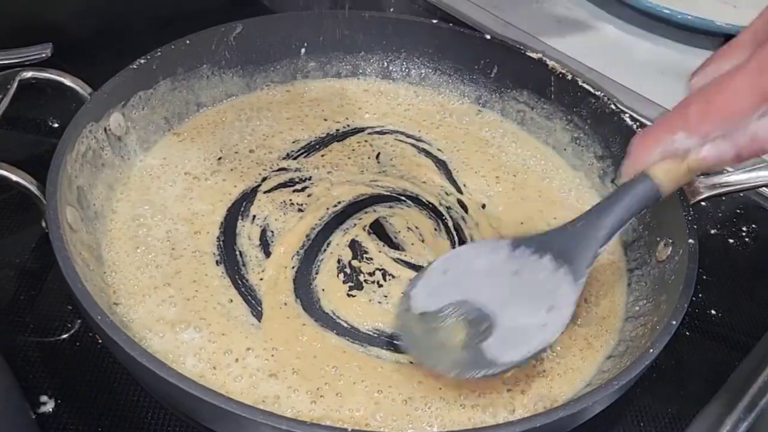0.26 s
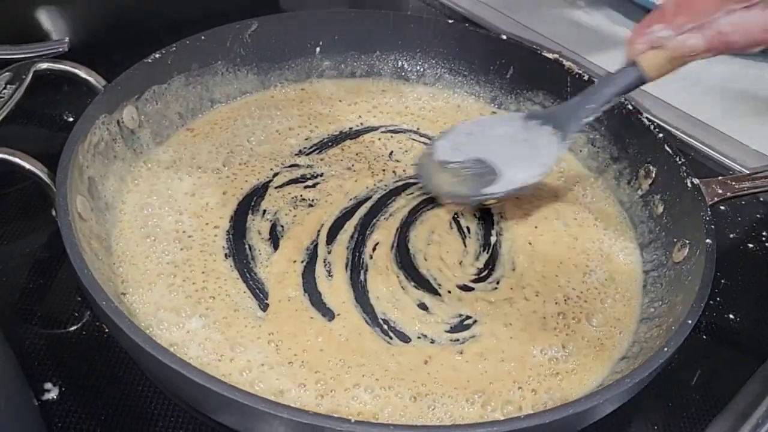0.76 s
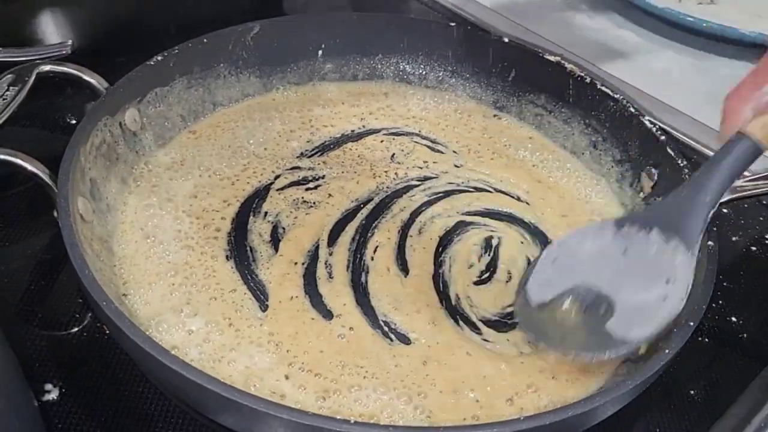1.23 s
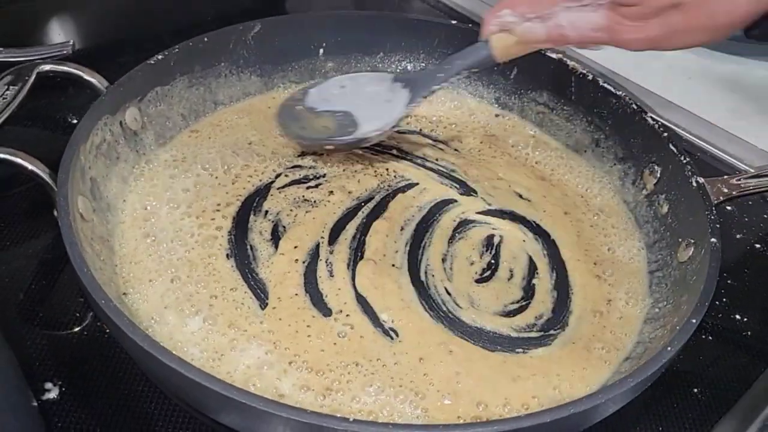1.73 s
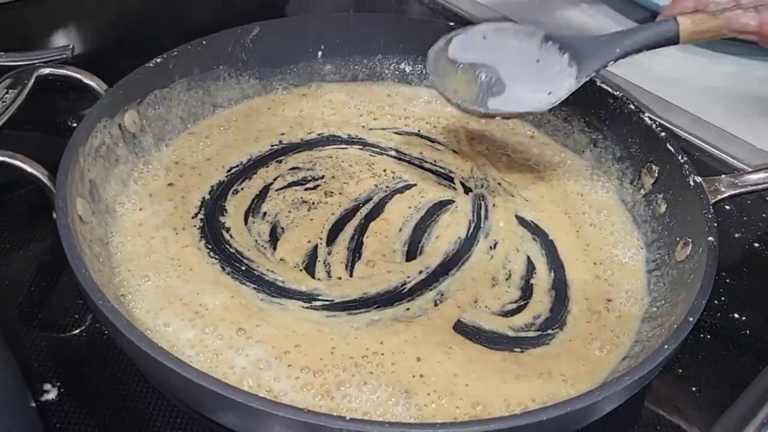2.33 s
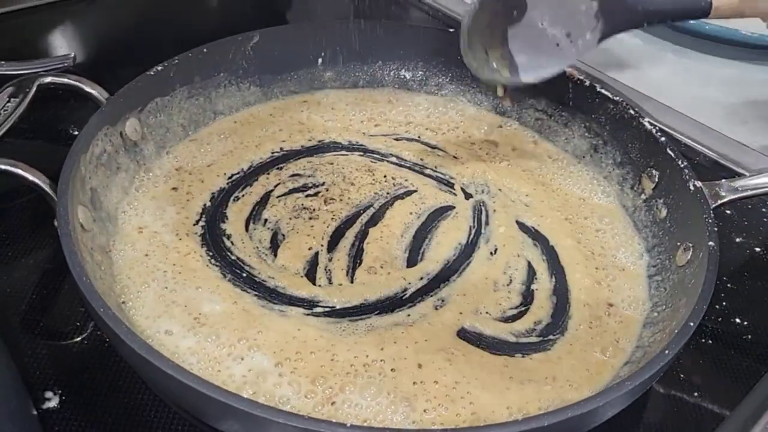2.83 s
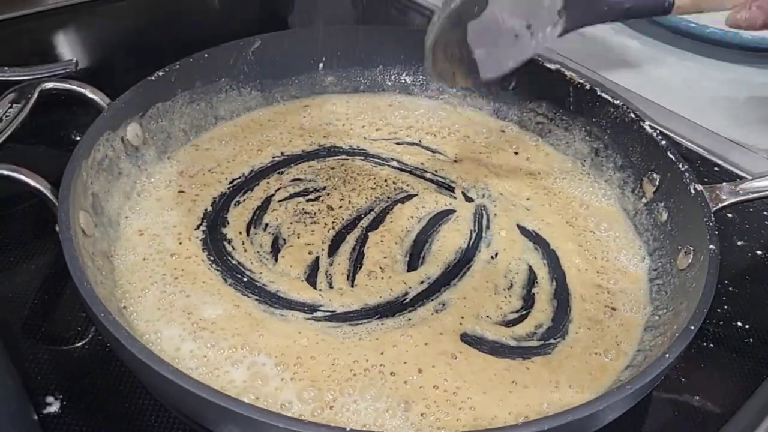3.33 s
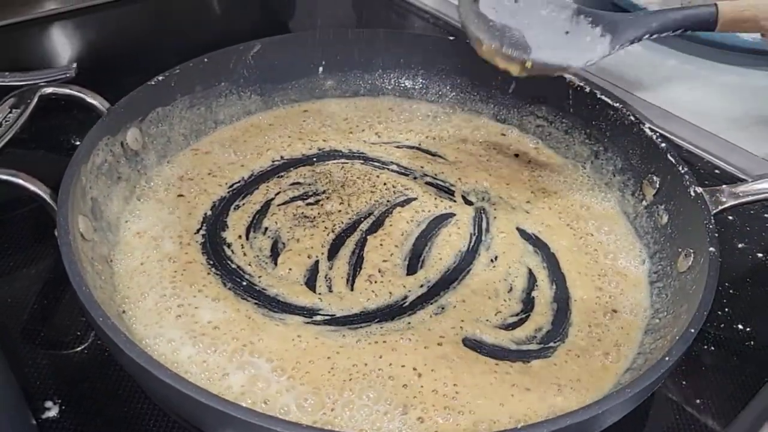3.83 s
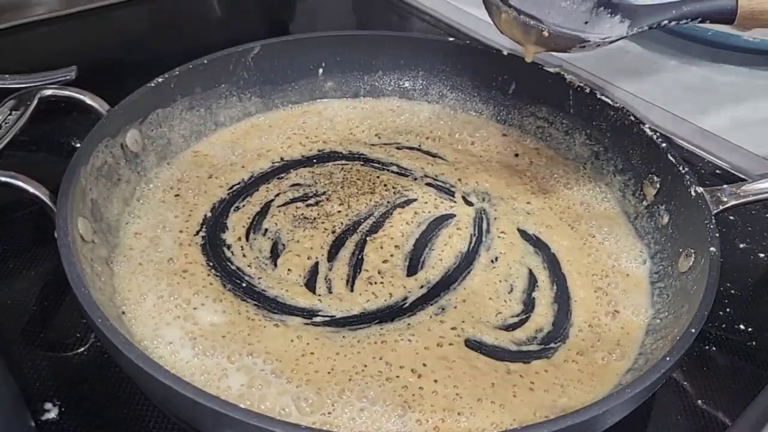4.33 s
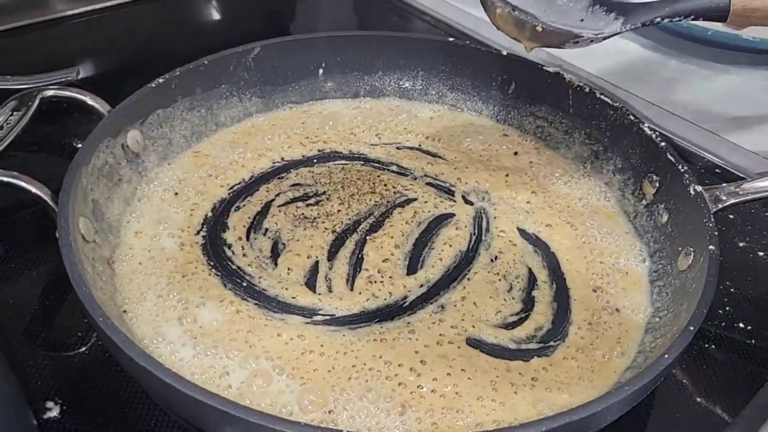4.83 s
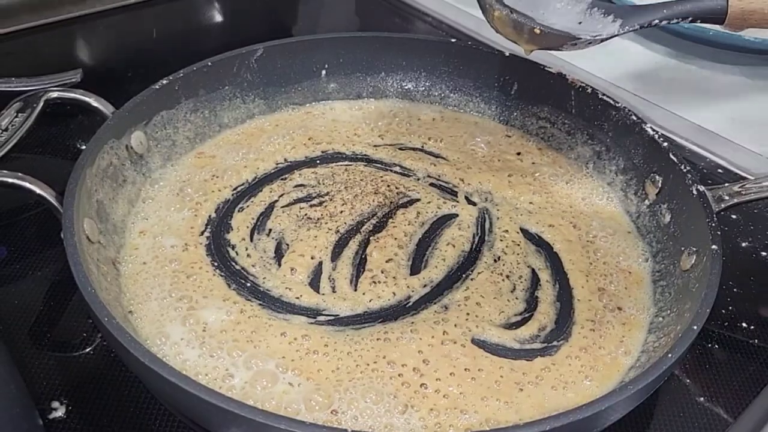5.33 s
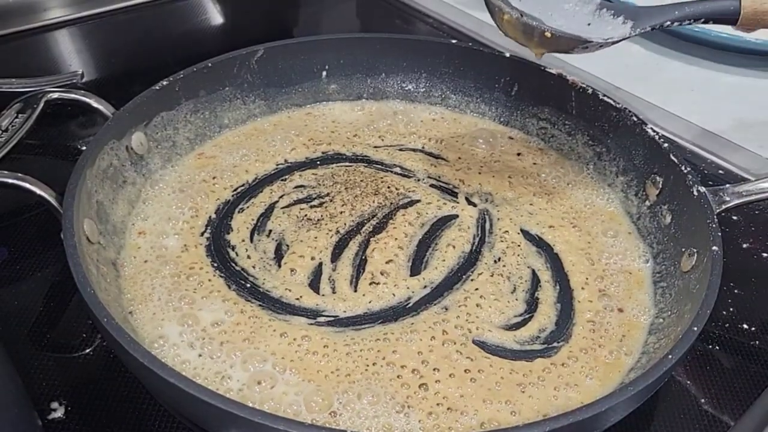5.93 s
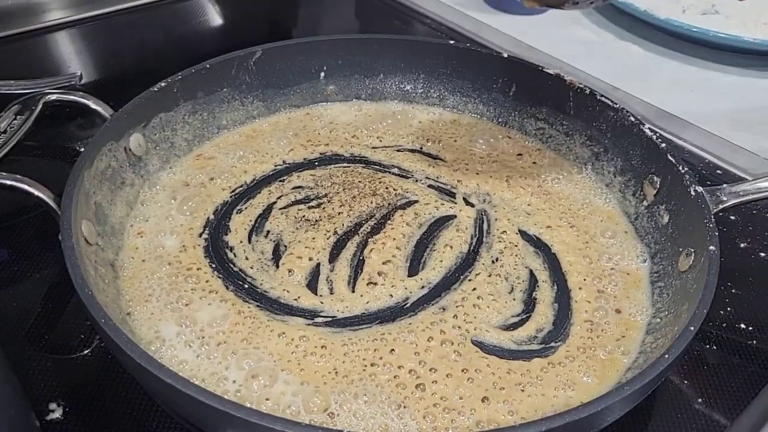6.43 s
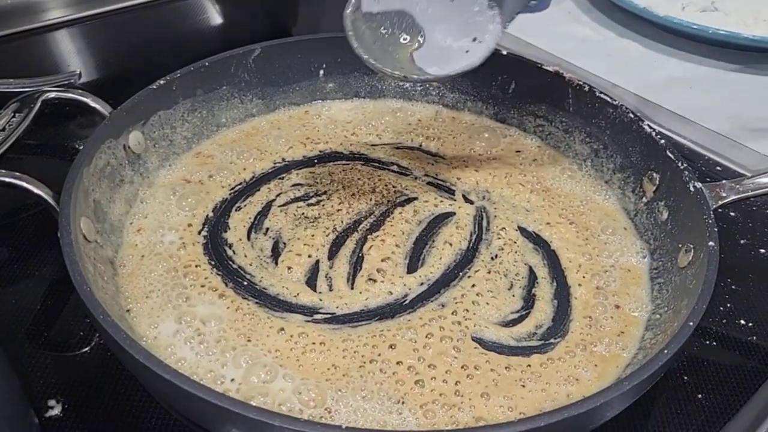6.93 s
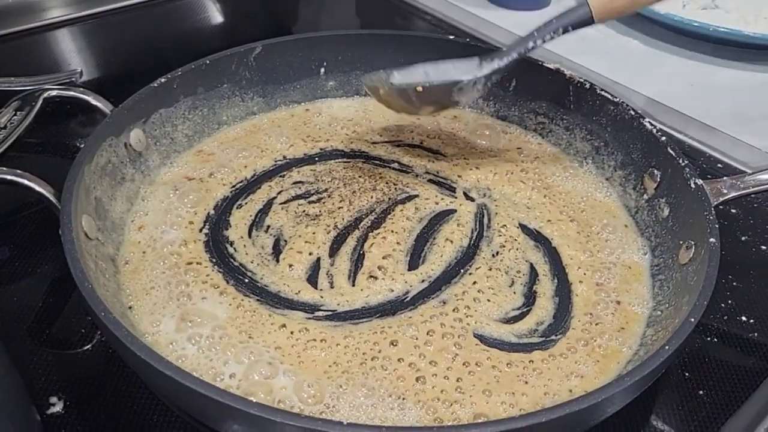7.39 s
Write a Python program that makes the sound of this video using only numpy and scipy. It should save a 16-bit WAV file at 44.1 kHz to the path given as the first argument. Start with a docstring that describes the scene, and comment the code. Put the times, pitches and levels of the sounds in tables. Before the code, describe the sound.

Close in a small kitchen, a pepper mill is twisted in ten short strokes, each a dry, bright, ratcheting crunch with sharp cracks. Beneath, a pan sizzles softly and a spoon squelches quietly in thick paste early on. A faint low motor drone and hob hum sit behind. After the grinding a small relay clicks, the hum stops, and the mill lands on the counter with a soft thump and clack.

```python
"""In a kitchen, a pepper mill is twisted in ten quick strokes over a pan of gently frying roux.
Turning teeth break chips off the corns, grit is crushed between them and whole corns crack: all are
noise bursts coloured by resonances. The sizzle is random grains and flickering hiss, freshened by a spoon
that squelches in the paste. A motor drones; the hob hums until its relay clicks open. Then the mill
is set down on the counter, with light knocks and rustles about it."""
import sys
import numpy as np
from scipy import signal
from scipy.fft import rfft, irfft, next_fast_len
from scipy.io import wavfile

SR = 44100
rng = np.random.default_rng(int(sys.argv[2]) if len(sys.argv) > 2 else 0)


def dump(signal):
    """Clip the signal to [-1, 1] and save it as 16-bit WAV at the path in sys.argv[1]."""
    limited = np.clip(np.atleast_2d(signal).T, -1, 1)
    pcm = np.round(limited * 32767).astype(np.int16)
    wavfile.write(sys.argv[1], SR, pcm)


N = 337666
TIME = np.arange(N) / SR   # s

# Spectrum of the room noise. Each row: frequency in Hz, relative density in dB per Hz.
ROOM_NOISE = [(25, -5.5), (50, -1), (70, -3), (92, 6), (115, -3.5), (160, -7.5), (230, -4), (330, -2),
              (480, -13), (900, -14), (2000, -24), (5000, -31.5)]
# Likeness of diffuse noise at the two microphones. Each row: frequency in Hz, left-right correlation.
CORRELATION = [(50, 0.74), (180, 0.88), (380, 0.37), (700, 0), (16000, 0)]
# Reverberation of the kitchen. Each row: frequency in Hz, time to fall by 60 dB in seconds.
ROOM_T60 = [(200, .35), (1500, .36), (3000, .45), (8000, .38), (15000, .3)]
# Unequal colour of the two microphones. Each row: frequency in Hz, left minus right in dB.
MICROPHONE_DIFFERENCE = [(900, -1.5), (1450, 1), (1900, -1.5), (2450, 4.5), (2850, 1.5), (3650, -5.5),
                         (4250, -4), (5100, 3.5), (6300, -1), (8800, 2), (12500, -0.5), (15500, 2.5)]

# Spectrum of the sizzle. Each row: frequency in Hz, relative density in dB per Hz.
SIZZLE = [(500, -23.5), (900, -22), (1200, -7.5), (2100, -1), (2900, -5), (4800, -5), (6200, -0.5),
          (7500, -6), (8400, -2.5), (11000, -6), (12800, -4), (14200, -5.5), (16000, -6.5)]
# Lone bubbles bursting in the fat. Each row: start in seconds, level in dB, ring in Hz,
# left minus right in dB.
POPS = [(1.035, -38, 5580, 0), (1.3865, -37, 9000, 0), (2.048, -41, 3980, -1), (5.114, -48, 5500, 0),
        (5.2026, -26, 12400, 5)]
# How hard the spoon pushes through the paste. Each row: time in seconds, level in dB.
STIRRING = [(0, -57), (.35, -56), (1.05, -59.5), (1.55, -63), (2.0, -59.5), (2.19, -58), (2.32, -68.5),
            (2.9, -70.5), (7.66, -71)]
# Spectrum of the dragged paste. Each row: frequency in Hz, relative density in dB per Hz.
PASTE = [(200, -9.5), (350, -1), (480, -10), (660, 7.5), (880, -6.5), (1150, 1), (1400, -2.5), (3000, -25),
         (6000, -32)]
# The loudest wet squelches. Each row: start in seconds, level in dB, pitch in Hz.
SQUELCHES = [(.258, -50, 689), (.268, -50.5, 298), (.544, -54, 555), (.637, -52, 690), (.692, -53.5, 543),
             (1.066, -53, 670), (1.613, -53.5, 633), (1.622, -56, 413), (2.167, -52.5, 670),
             (2.213, -53.5, 637)]
# Resonances of an air pocket. Each row: multiple of its pitch, lift in dB, Q.
POCKET = [(1, 37.5, 1.4), (1.75, 28.5, 8.8)]

# Soft rustles, and a brighter burst at the very start. Each row: start in seconds, level in dB, centre in Hz,
# length in seconds.
SCUFFS = [(0, -43, 3500, .016), (5.224, -61.5, 610, .02), (6.734, -59.5, 400, .02),
          (5.473, -59.5, 2120, 0.036), (5.474, -55.5, 12600, .036), (5.48, -63, 8340, .19),
          (6.453, -59.5, 7000, .06), (6.852, -66, 2360, .2), (7.513, -56, 6100, .03),
          (7.528, -63, 1830, 0.069)]
# Light knocks of kitchenware. Each row: start in seconds, level in dB.
KNOCKS = [(6.235, -57.5), (6.736, -64), (6.934, -47.5)]
# Resonances of the kitchenware. Each row: frequency in Hz, lift in dB, Q.
WARE = [(590, 24, 1.6), (1380, 15, 3), (2460, 17.5, 1.6)]
# Resonances of the hob's relay. Each row: frequency in Hz, lift in dB, Q.
RELAY = [(590, 23, 2.3), (1265, 27, 4.2), (3000, 22, 3.3)]
# Blows of the mill landing on the counter. Each row: start in seconds, gain on the modes in dB.
LANDINGS = [(6.259, 0), (6.27, -3)]
# Modes of the counter. Each row: frequency in Hz, amplitude in dB, time to fall by 60 dB in seconds.
COUNTER = [(75.5, -47, 0.23), (118, -42.5, .17), (204, -42, 0.14), (262, -48, 0.12), (430, -50, 0.089),
           (605, -53, .063), (754, -45.5, .07), (964, -50.5, .06), (1230, -59, 0.049), (3560, -52, 0.072),
           (3850, -55, .09), (4040, -55, .11), (4230, -58, .08)]
# Resonances of the mill's base. Each row: frequency in Hz, lift in dB, Q.
BASE = [(128, 31, 1.8), (620, 23.6, 1.06), (3830, 19.7, 3.5), (7300, 13, 3)]

# Twists of the mill. Each row: start in seconds, end in seconds, effort in dB, treble lift in dB,
# typical ring of the burr in Hz.
TWISTS = [(.392, 0.489, -32.5, -2, 3380), (0.816, 0.918, -34.5, 0, 2700), (1.258, 1.268, -40.5, -7, 1710),
          (1.818, 1.967, -37.5, -1, 2900), (2.36, 2.534, -38, -3.5, 2780),
          (2.895, 3.036, -37.5, -1.5, 3090), (3.378, 3.505, -33, -1, 2950),
          (3.857, 3.965, -34.5, -5.5, 2530), (4.37, 4.464, -35, -5, 1850),
          (4.874, 4.908, -29.5, -2.5, 2250)]
# Whole peppercorns cracking. Each row: start in seconds, relative level in dB, ring in Hz,
# extra low middle in dB, extra treble in dB.
CRACKS = [(0.3466, -22, 1770, 10.5, 1.5), (.356, -24.5, 3320, 2, 4), (0.4322, -20.5, 3300, 2, 6),
          (.439, -23, 2820, -7, 3), (0.4575, -20.5, 3600, -14, 5.5), (0.4636, -15.5, 2000, 8.5, -0.5),
          (0.4792, -28, 3640, 9, 3), (.491, -24, 7300, -4, 11), (0.8183, -23.5, 2650, -8, 4),
          (.834, -26, 2630, 6, 3), (.8687, -18, 2800, 1, 3), (0.9167, -21, 2800, 0.5, 2),
          (1.2505, -24, 2180, 6.5, -1.5), (1.816, -19, 6350, -2.5, 0), (1.83, -25, 5350, -3, 1),
          (1.8412, -24, 6650, 0, 2), (1.86, -22, 6400, -15, -2), (1.8983, -23.5, 6180, 11.5, 6.5),
          (1.9271, -17, 1530, 0.5, -4.5), (2.3494, -34, 3810, -1, -3), (2.372, -19, 3780, 1, -0.5),
          (2.4117, -18, 2170, 0.5, -3.5), (2.432, -23, 3210, -4, -1), (2.4384, -23, 2760, 2.5, -3),
          (2.4509, -23, 2760, 1, -2.5), (2.5011, -22.5, 2760, -4, -3.5), (2.5098, -20, 3330, -0.5, 2.5),
          (2.88, -40.5, 3500, -5, 0), (2.9465, -23, 6340, 2, 8.5), (2.958, -26, 4300, 3, 10),
          (3.0353, -25, 2830, 5.5, 9), (3.3724, -28, 3000, -6, 0), (3.386, -23, 1510, 7, 1),
          (3.4375, -20.5, 2920, -5, 6), (3.4602, -27, 5340, -10, 1), (3.47, -20.5, 5640, -6, 3),
          (3.4977, -24.5, 3040, 4, 6), (3.8471, -26, 2400, 7, 4), (3.9043, -24.5, 4070, 0, 2),
          (3.94, -18.5, 1740, 1.5, 3), (4.3606, -29, 3000, -7, -3), (4.3904, -17.5, 3320, 5.5, 6),
          (4.437, -22.5, 1790, 13, -12), (4.45, -30, 1730, -2, -13), (4.866, -14, 6600, -8, -3),
          (4.8876, -24.5, 2340, -2, -8), (4.8946, -24.5, 3080, -1, 2), (4.9064, -24.5, 6100, -11, -6)]
# Broad colour of the mill. Each row: frequency in Hz, relative density in dB per Hz.
MILL = [(100, -10), (300, -5.5), (650, -8), (950, -32.5), (1220, -6.5), (1480, 1), (2200, 0), (3300, -0.5),
        (4800, -1.5), (6300, -1), (8500, -3.5), (11000, -3.5), (13000, -5.5), (16000, -8)]
# Resonances of the mill's housing. Each row: frequency in Hz, lift in dB, Q.
HOUSING = [(1496, 3, 16), (1890, 1.5, 27), (2210, 2.5, 26), (2750, 5, 34), (3680, 3, 15), (4670, -0.5, 25),
           (6280, 2, 18)]

ROOM_NOISE_DB = -62.5
MOTOR_HZ, MOTOR_DB, HOB_HZ, HOB_DB = 46.8, -63.5, 120.6, -63.5   # steady tones, dB rms
RELAY_S, RELAY_DB = 5.363, -50
CLACK_DB = -44.5   # the mill's base on the counter
# the sizzle dies down as the pan cools; stirring bares fresh fat (dB against the stirring)
SIZZLE_START_DB, COOLING_DB_PER_S, STIRRED_SIZZLE_DB = -55.5, 1.34, 5.5
SMALL_SQUELCH_HZ, SMALL_SQUELCH_DB = 786, -3.5   # typical pitch, mean level against the stirring
EDGE_S = 0.0037   # the burr bites and lets go this fast
SLACK_DB, TAKE_UP_S, RUN_OUT_S = -4.5, 0.022, 0.042   # light scrape around each twist
TEETH_PER_S = 101
CHIP_DB, CHIP_SPREAD_DB, GRIT_DB = 3.5, 1.5, -2.5   # means against the effort, and spread of the chips
CUTOFF_HZ = 15850   # top of the microphones' range


def from_db(db):
    """Logarithmic level: decibels become an amplitude gain."""
    return 10 ** (np.asarray(db) / 20)


def rms_one(x):
    """Normalised power: the signal is scaled to rms 1."""
    return x / np.sqrt(np.mean(x ** 2) + 1e-20)


def at_hz(points, hz):
    """Logarithmic frequency scale: a table is read by straight lines along log frequency."""
    points = np.array(points, float)
    return np.interp(np.log(np.maximum(hz, 1)), np.log(points[:, 0]), points[:, 1])


def in_time(rows):
    """Linear interpolation: straight lines join rows of time and value."""
    return np.interp(TIME, *np.transpose(rows))


def bins(size):
    """Discrete Fourier analysis: the frequencies of a real spectrum."""
    return np.fft.rfftfreq(size, 1 / SR)


def tint(x, curve_db):
    """Linear filtering: each frequency is weighted by a curve in dB; rms 1."""
    size = next_fast_len(x.shape[-1])
    spectrum = rfft(x, size) * from_db(curve_db(bins(size)))
    return rms_one(irfft(spectrum, size)[..., :x.shape[-1]])


def hump(hz, centre_hz, q):
    """Resonance: response peaks at 1 and falls on either side, faster for a higher Q."""
    return 1 / (1 + (2 * q * (hz - centre_hz) / centre_hz) ** 2)


def resonances(hz, modes):
    """Several resonances: their lifts add in dB."""
    return sum(db * hump(hz, centre_hz, q) for centre_hz, db, q in modes)


def add(out, s, sound):
    """Superposition: a sound is mixed in at time s."""
    i = int(np.clip(round(s * SR), 0, N - 1))
    out[..., i:i + sound.shape[-1]] += sound[..., :N - i]


def stereo_noise(spectrum):
    """Diffuse field: noise at spaced microphones is alike only in the bass."""
    size = next_fast_len(N)
    mid, side = rfft(rng.standard_normal((2, size)))
    alike = np.clip(at_hz(CORRELATION, bins(size)), -.99, .99)
    pair = irfft(np.sqrt(1 + alike) * mid + np.sqrt(1 - alike) * side * [[1], [-1]], size)
    return tint(pair[:, :N], lambda hz: at_hz(spectrum, hz))


def grains(per_s, spread_db, decay_s):
    """Shot noise: random tiny bursts of unequal size, each dying quickly; rms 1."""
    hits = rng.random(N) < per_s / SR
    sizes = from_db(spread_db * np.minimum(rng.exponential(1, N), 2))
    power = signal.lfilter([1], [1, -np.exp(-2 / (decay_s * SR))], hits * sizes ** 2 + 1e-18)
    return rms_one(np.sqrt(power) * rng.standard_normal((2, N)))


def burst(curve_db, rise_s, hold_s, decay_s):
    """Transient: coloured noise rises, holds and decays exponentially; rms 1 over its body."""
    t = np.arange(int((hold_s + 7 * decay_s) * SR) + 64) / SR
    shape = (1 - np.exp(-t / rise_s)) * np.exp(-np.maximum(t - hold_s, 0) / decay_s)
    sound = shape * tint(rng.standard_normal((2, len(t))), curve_db)
    return sound / np.sqrt(np.mean(sound[:, t < hold_s + decay_s] ** 2))


def struck(modes):
    """Modal decay: one blow rings damped sines, with random time offsets at each microphone."""
    t = TIME[:SR // 2]
    lags_s = rng.normal(0, 0.00029, (len(modes), 2, 1))   # shifts the phase of higher modes more
    sound = 0
    for (hz, db, t60), lag_s in zip(modes, lags_s):
        sound = sound + from_db(db - 60 * t / t60) * np.sin(2 * np.pi * hz * (t + lag_s))
    return sound


def flicker(x, depth_db, per_s):
    """Independent modulation: each frequency band swells and sinks on its own; rms 1."""
    size, out = next_fast_len(N), 0
    centres = np.linspace(1000, 16000, num=16)   # Hz
    spectrum = rfft(x, size)
    for share in np.eye(len(centres)):
        band = irfft(spectrum * np.interp(bins(size), centres, share), size)[:, :N]
        steps = from_db(depth_db * rng.standard_normal(size=1000))
        out = out + band * np.interp(TIME * per_s, np.arange(len(steps)), steps)
    return rms_one(out)


def kitchen(x, near_db, room_db, near_s=0.0069, first_s=.003):
    """Reverberation: close reflections, then a tail whose bands decay at their own rates."""
    t = TIME[:int(.6 * SR)]
    arrived = t > first_s
    near = rng.standard_normal((2, len(t))) * np.exp(-t / near_s) * arrived
    edges, tail = np.geomspace(100, 17000, num=9), 0
    for low, high in zip(edges, edges[1:]):
        band_filter = signal.butter(2, [low, high], "band", fs=SR, output="sos")
        band = signal.sosfilt(band_filter, rng.standard_normal((2, len(t))))
        t60 = at_hz(ROOM_T60, np.sqrt(low * high))
        tail = tail + band * from_db(-60 * t / t60) * arrived
    response = (from_db(near_db) * rms_one(near) + from_db(room_db) * rms_one(tail)) / np.sqrt(len(t))
    return x + signal.fftconvolve(x, response, axes=1)[:, :N]


def room_noise():
    """Ambient noise: a steady diffuse field, strongest in the bass."""
    return from_db(ROOM_NOISE_DB) * stereo_noise(ROOM_NOISE)


def tone(hz, db):
    """Simple harmonic motion: a sine of given rms level and random phase."""
    return np.sqrt(2) * from_db(db) * np.sin(2 * np.pi * (hz * TIME + rng.random()))


def motor_drone():
    """Periodic forcing: a motor drones throughout on one low tone."""
    return tone(MOTOR_HZ, MOTOR_DB)


def hob_hum():
    """Alternating force: the hob hums at twice the mains rate, fading fast once the relay opens."""
    return tone(HOB_HZ, HOB_DB) * np.clip((RELAY_S - TIME) / .02 + 1, 0, 1)


def frying(crackle_db=-5, hiss_db=1.7):
    """Bubble noise: foam fizzes up and fades by bands, with fine crackle and a few larger pops."""
    crackle = tint(grains(per_s=320, spread_db=5.0, decay_s=0.00038), lambda hz: at_hz(SIZZLE, hz))
    hiss = flicker(stereo_noise(SIZZLE), depth_db=2.2, per_s=16)
    cooling = from_db(SIZZLE_START_DB - COOLING_DB_PER_S * TIME)
    freshened = from_db(in_time(STIRRING) + STIRRED_SIZZLE_DB)
    vigour = np.hypot(cooling, freshened)   # powers add
    out = vigour * (from_db(crackle_db) * crackle + from_db(hiss_db) * hiss)
    for s, db, ring_hz, left_right_db in POPS:
        colour = lambda hz: 24 * hump(hz, ring_hz, q=1.5)
        pop = burst(colour, rise_s=.0001, hold_s=.0012, decay_s=.0007)
        add(out, s, from_db(db + left_right_db * np.array([[.5], [-.5]])) * pop)
    return out


def spoon(paste_db=-2, count=90):
    """Viscous drag and cavity resonance: paste rubs and air pockets open, small ones at random."""
    push_db = in_time(STIRRING)
    out = from_db(push_db + paste_db) * stereo_noise(PASTE)
    squelches = list(SQUELCHES)
    for when, size, pitch in rng.random((count, 3)):
        db = push_db[int(when * N)] + SMALL_SQUELCH_DB + 8 * (size - .5)
        squelches.append((when * N / SR, db, SMALL_SQUELCH_HZ * 2 ** (pitch - .5)))
    for s, db, pocket_hz in squelches:
        colour = lambda hz: resonances(hz / pocket_hz, POCKET)
        add(out, s, from_db(db) * burst(colour, rise_s=0.0016, hold_s=.012, decay_s=0.011))
    return out


def falling_pepper(fall_s=.24, scatter_s=0.09, level_db=-53.5):
    """Delayed impacts: the grounds of each longer twist patter into the pan after their fall."""
    landed = TIME - fall_s
    shower = 0
    for start, end, *_ in TWISTS:
        if end - start > .08:
            shower = shower + np.clip(np.minimum(landed - start, end - landed) / scatter_s + .5, 0, 1)
    patter = grains(per_s=1500, spread_db=3, decay_s=.0007)
    return from_db(level_db) * shower * tint(patter, lambda hz: at_hz(SIZZLE, hz))


def rustles():
    """Short noises: soft rustles of friction, and a brighter burst at the very start, each gathered around one
    frequency."""
    out = np.zeros((2, N))
    for s, db, centre_hz, length_s in SCUFFS:
        colour = lambda hz: 14 * np.log10(hump(hz, centre_hz, q=1.8))
        add(out, s, from_db(db) * burst(colour, length_s / 10, length_s / 2, length_s / 2))
    return out


def knocks():
    """Damped impact: kitchenware knocks lightly through its broad resonances."""
    out = np.zeros((2, N))
    for s, db in KNOCKS:
        knock = burst(lambda hz: resonances(hz, WARE), rise_s=.001, hold_s=.007, decay_s=0.01)
        add(out, s, from_db(db) * knock)
    return out


def relay_click():
    """Impulsive excitation: the opening relay clicks through its resonances."""
    out = np.zeros((2, N))
    click = burst(lambda hz: resonances(hz, RELAY), rise_s=.0005, hold_s=.004, decay_s=.0093)
    add(out, RELAY_S, from_db(RELAY_DB) * click)
    return out


def setting_down():
    """Impact of two bodies: the mill's base clacks once, and each landing rings the counter."""
    out = np.zeros((2, N))
    clack = burst(lambda hz: resonances(hz, BASE), rise_s=0.00088, hold_s=.008, decay_s=.012)
    add(out, LANDINGS[0][0], from_db(CLACK_DB) * clack)
    for s, db in LANDINGS:
        add(out, s, from_db(db) * struck(COUNTER))
    return out


def mill_colour(hz):
    """Source and resonator: whatever is crushed is coloured by the mill and its housing."""
    return at_hz(MILL, hz) + resonances(hz, HOUSING)


def effort(start, end, t=TIME):
    """Stick and bite: a light scrape swells, the burr bites and holds, then runs out; 0 to 1."""
    bite = np.clip(np.minimum(t - start, end - t) / EDGE_S, 0, 1)
    scrape = np.clip(1 + np.minimum((t - start) / TAKE_UP_S, (end - t) / RUN_OUT_S), 0, 1)
    return np.maximum(bite, from_db(SLACK_DB) * scrape)


def splinter(ring_hz, low_db, treble_db, ring_db=8.5, ring_q=5):
    """Brittle fracture: a burst of about three milliseconds, its resonances varying by spot."""
    pitches = np.geomspace(1100, 16000, num=30)
    spot = np.column_stack([pitches, rng.normal(0, 2.5, len(pitches))])   # each spot of the burr differs
    own = [(1700, low_db), (3500, 0), (7000, treble_db - 1.5), (12000, treble_db + 0.7)]

    def colour(hz):
        """Combined response: lifts in dB add."""
        ring = ring_db * hump(hz, ring_hz, ring_q)
        return mill_colour(hz) + at_hz(own, hz) + at_hz(spot, hz) + ring
    return burst(colour, rise_s=0.00011, hold_s=.0026, decay_s=.0018)


def crumbling():
    """Granular crushing: fragments turn to grit while the burr turns."""
    grit, out = grains(per_s=600, spread_db=2.5, decay_s=0.0021), np.zeros((2, N))
    for start, end, db, bright_db, _ in TWISTS:
        span = slice(int((start - TAKE_UP_S) * SR), int((end + RUN_OUT_S) * SR))
        colour = lambda hz: mill_colour(hz) + at_hz([(3500, 0), (9000, bright_db)], hz)
        crushed = effort(start, end, TIME[span]) * tint(grit[:, span], colour)
        add(out, span.start / SR, from_db(db + GRIT_DB) * crushed)
    return out


def chipping(low_db=-2, jitter=.12, pitch_spread=.04, count=20):
    """Repeated fracture: each tooth of the turning burr bites off a chip, a little early or late."""
    out = np.zeros((2, N))
    for start, end, db, bright_db, ring_hz in TWISTS:
        for tooth, (late, size, pitch) in enumerate(rng.standard_normal((count, 3))):
            s = start + (tooth + .5 + jitter * late) / TEETH_PER_S
            chip_hz = ring_hz * np.exp(pitch_spread * pitch)
            chip = splinter(chip_hz, low_db, bright_db, ring_db=10.5, ring_q=6.0)
            chip_db = db + CHIP_DB + CHIP_SPREAD_DB * size
            add(out, s, effort(start, end, s) * from_db(chip_db) * chip)
    return out


def cracks(level_db=0.53):
    """Sudden release of strain: a whole corn gives way, shaking the burr and the housing."""
    out = np.zeros((2, N))
    for s, db, ring_hz, low_db, treble_db in CRACKS:
        add(out, s, from_db(db + level_db) * splinter(ring_hz, low_db, treble_db))
    return out


def radiated(force, corner_hz=1000, apart_hz=1100):
    """Small radiator: little bass is given off, and longer waves reach both microphones alike."""
    left, right = signal.sosfilt(signal.butter(2, corner_hz, "high", fs=SR, output="sos"), force)
    side_filter = signal.butter(1, apart_hz, "high", fs=SR, output="sos")
    side = signal.sosfilt(side_filter, (left - right) / 2)
    return (left + right) / 2 + side * np.array([[1], [-1]])


def scene():
    """Superposition: mill and handled things reverberate, over the pan and the background."""
    background = room_noise() + motor_drone() + hob_hum()
    pan = frying() + falling_pepper() + spoon()
    handling = rustles() + knocks() + relay_click() + setting_down()
    things = kitchen(handling, near_db=-10.0, room_db=-8.0)
    mill = kitchen(radiated(cracks() + chipping() + crumbling()), near_db=-8, room_db=-14.5)
    return background + pan + things + mill


def record(dry):
    """Transducer response: each microphone has its own colour, and the top is cut."""
    size = next_fast_len(N + SR // 10)
    tilt = from_db(at_hz(MICROPHONE_DIFFERENCE, bins(size)) * np.array([[.5], [-.5]]))
    heard = irfft(rfft(dry, size) * tilt, size)[:, :N]
    return signal.sosfilt(signal.ellip(10, .3, 70, CUTOFF_HZ, fs=SR, output="sos"), heard)


dry = scene()
out = record(dry)
dump(out)
```